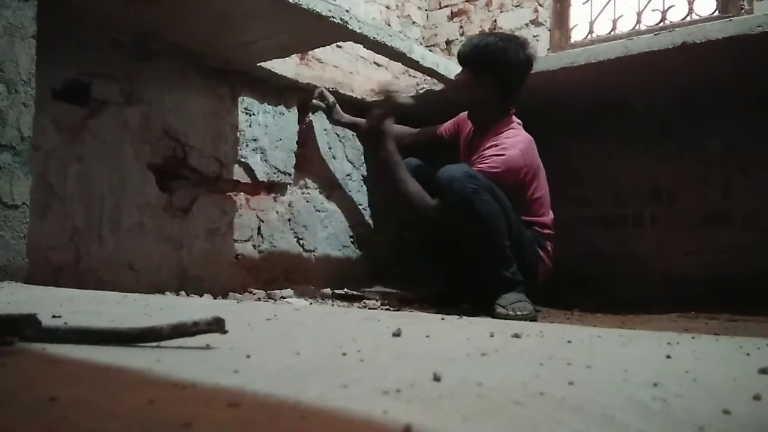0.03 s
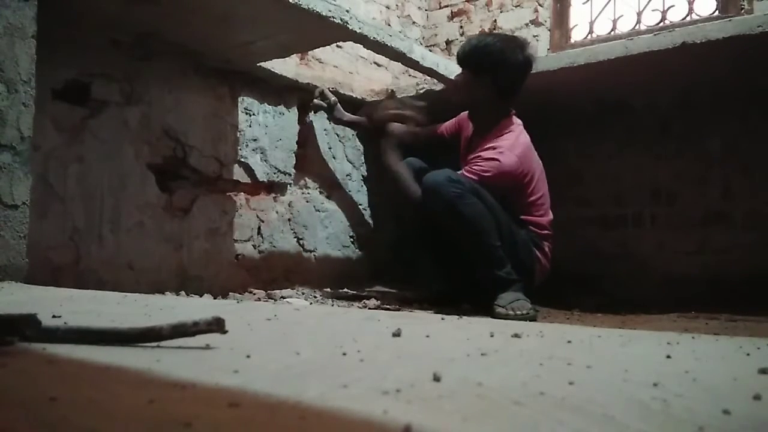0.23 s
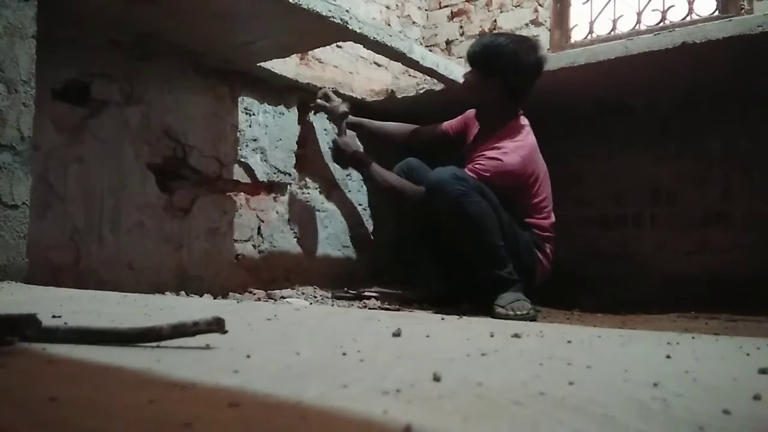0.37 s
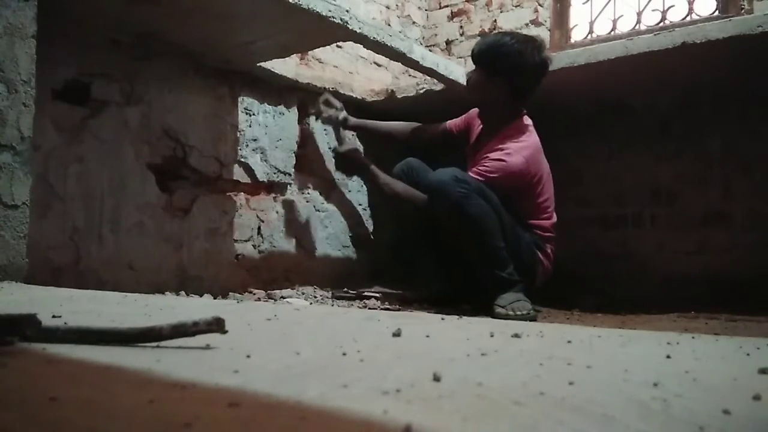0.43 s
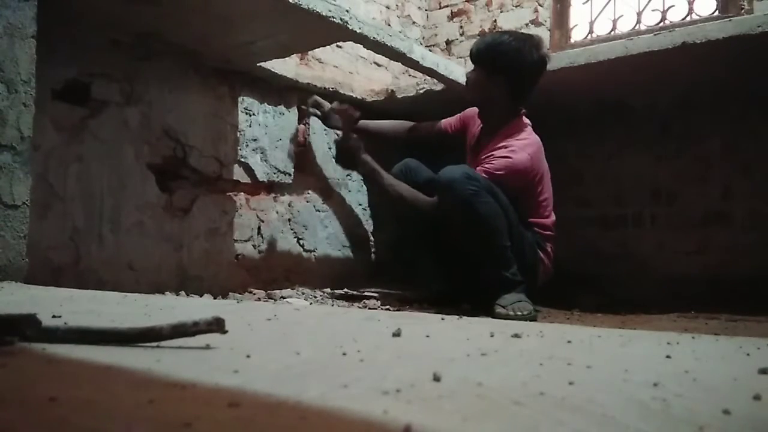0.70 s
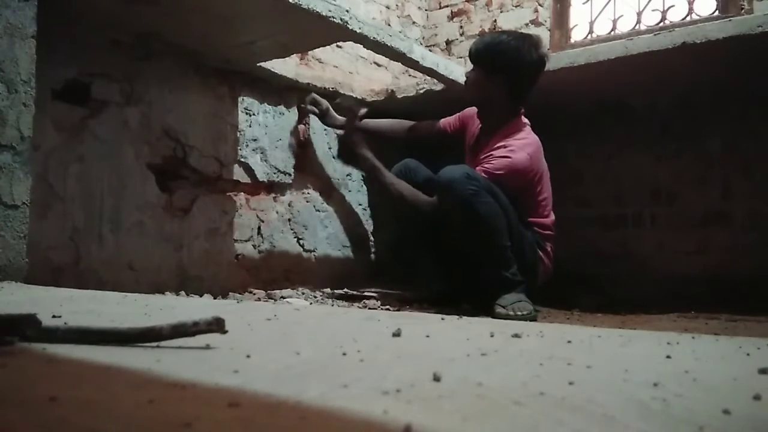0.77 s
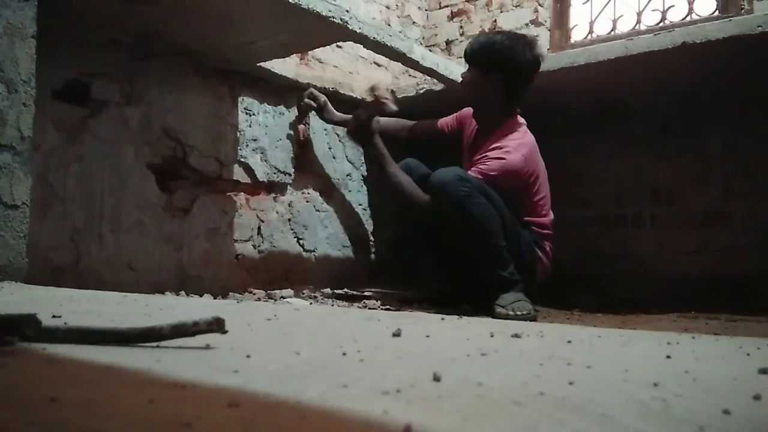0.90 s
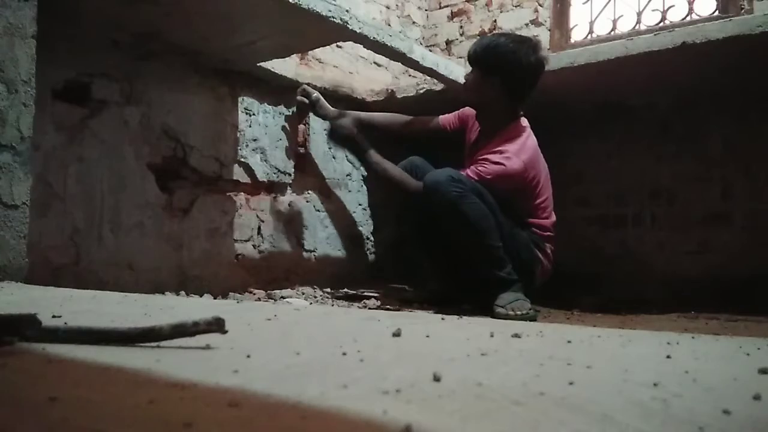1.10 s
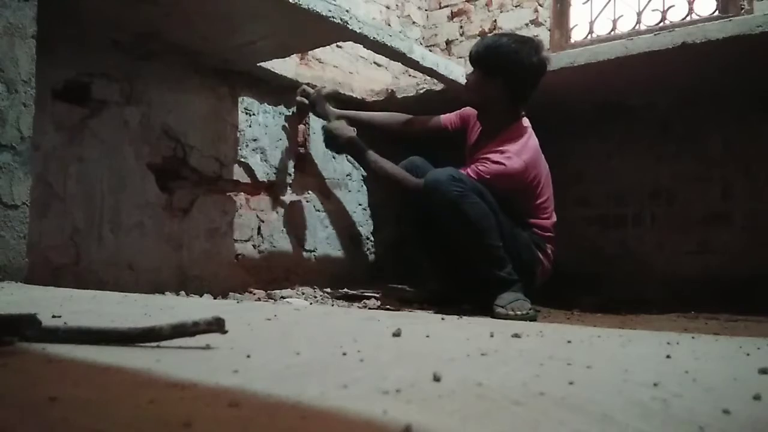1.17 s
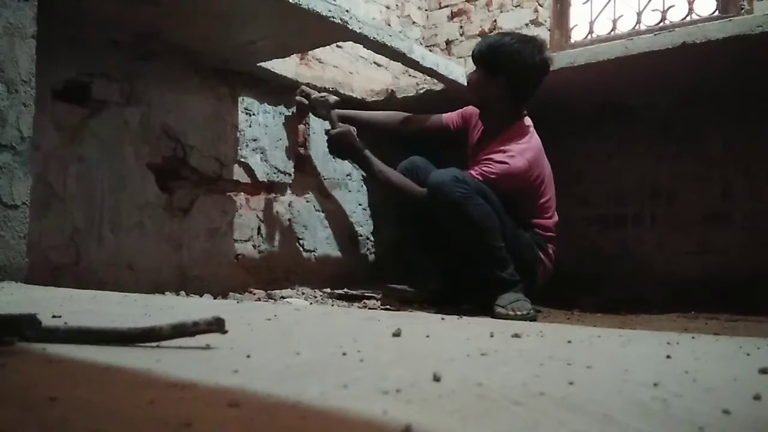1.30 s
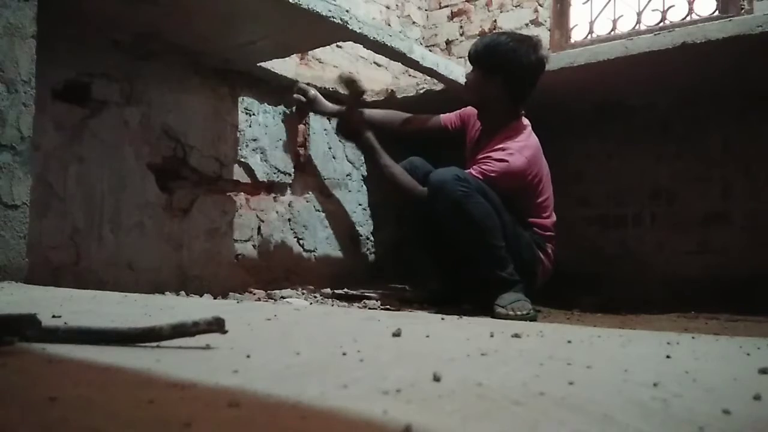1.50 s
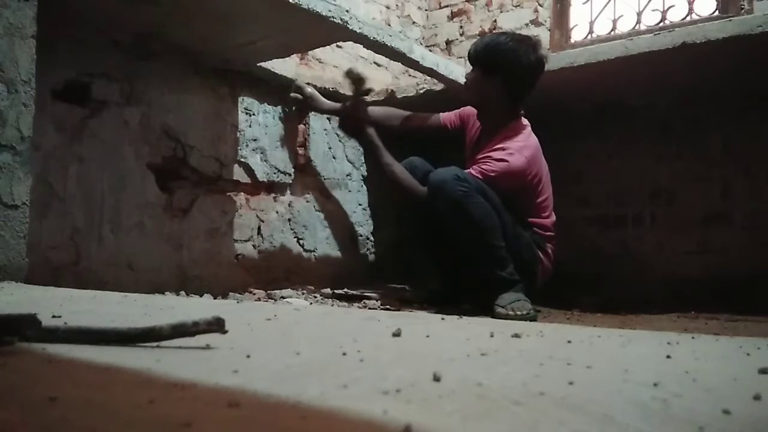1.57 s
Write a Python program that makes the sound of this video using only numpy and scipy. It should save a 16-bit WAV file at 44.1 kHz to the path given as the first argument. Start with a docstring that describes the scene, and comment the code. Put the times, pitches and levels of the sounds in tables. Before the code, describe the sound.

A hammer strikes a steel chisel into a masonry wall at about 0.35 and 1.2 seconds, each close hit a crack and thud with a very high ring and booming concrete-room reverberation; the second is slightly softer. Faint distant blows come near 0.2 and 0.9 seconds, and the chisel ticks lightly at 0.8. Grit trickles around 0.15, 0.85 and 1.55 seconds over a low rumble.

```python
"""A bare concrete room rumbles with distant blows, probably a second worker's: a faint knock, then swelling
reverberation. Grit trickles; then a hammer drives a steel chisel into the masonry wall: the wall cracks
and thuds, the chisel rings very high, the room booms, a dull echo returns, and a limiter ducks and
recovers. The chisel ticks on the wall, grit slides and another far blow sounds. The hammer strikes a
second time, the limiter ducks again, and a last trickle of grit falls as the reverberation dies away."""
import sys
import numpy as np
from scipy import signal
from scipy.fft import rfft, irfft, next_fast_len
from scipy.io import wavfile
from scipy.ndimage import uniform_filter1d

SR = 44100
rng = np.random.default_rng(int(sys.argv[2]) if len(sys.argv) > 2 else 0)


def wav_out(sig):
    """Save sig, one row per channel (or a flat mono array), as 16-bit PCM at SR to the path in sys.argv[1]."""
    wavfile.write(sys.argv[1], SR, np.round(np.clip(np.atleast_2d(sig).T, -1, 1) * 32767).astype(np.int16))


N = 72765
TIME = np.arange(N) / SR
CUTOFF_HZ, NEAR_BUILD_S = 15600, 0.0032

# Near blows. Each row: start in seconds, level in dB, thud gain in dB, chisel ring level in dB,
# favoured ring frequency in Hz, crack tilt in dB per octave, rebound delay in seconds,
# rebound gain in dB, wall note in Hz, its gain in dB.
BLOWS = [(.3550, 2, 8.5, 5, 14600, -1.5, .0208, -3, 1550, -38),
         (1.1861, -2, 8.5, -8.5, 12240, 1, .0083, -5, 1816, -34.5)]
# Far blows. Each row: start in seconds, level in dB, tilt in dB per octave,
# shift of the steel ring in Hz, its gain in dB.
FAR_BLOWS = [(-.45, -1.5, 10, -2, -38), (0.2132, -0.5, 0, 0, -28), (.8810, -1.5, -0.5, 505.5, -33)]
# The room's reverberation time. Each row: frequency in Hz, time to fall 60 dB (t60) in seconds.
ROOM_T60 = [(70, 2), (160, 1.79), (500, 1.59), (1400, 0.83), (3200, 0.98), (7500, 0.7), (11000, 0.37),
            (15000, 0.36)]


def from_db(db):
    """Decibels to amplitude ratio."""
    return 10 ** (np.asarray(db) / 20)


def rms_one(x):
    """Normalisation to unit rms."""
    return x / np.sqrt(np.mean(x ** 2) + 1e-20)


def at_hz(points, hz):
    """Interpolation of a table on a log-frequency axis."""
    frequencies, values = np.transpose(points)
    return np.interp(np.log(hz), np.log(frequencies), values)


def since(start):
    """Elapsed seconds, zero before the start."""
    return np.maximum(TIME - start, 0)


def decay(start, t60, build_s=1 / SR):
    """Exponential build-up and damping: the envelope of a struck system."""
    age = since(start)
    return (1 - np.exp(-age / build_s)) * np.exp(-np.log(1000) * age / t60)


def struck_mode(start, hz, t60, build_s=1 / SR):
    """Free vibration of one mode: a damped sinusoid."""
    return decay(start, t60, build_s) * np.sin(2 * np.pi * hz * since(start))


def band_noise(hz, width_hz):
    """A resonance smeared by the room: narrow-band noise of unit rms."""
    band = signal.butter(2, [hz - width_hz / 2, hz + width_hz / 2], "band", fs=SR, output="sos")
    return rms_one(signal.sosfilt(band, rng.standard_normal(N + SR // 10))[-N:])


def coloured(spectrum, envelope, tilt_db=0):
    """Spectral shaping: noise in overlapping octave bands, each under its own envelope(hz)."""
    size = next_fast_len(N + 1)
    bin_hz = np.maximum(np.fft.rfftfreq(size, 1 / SR), 1)
    octaves_hz = np.geomspace(60, 15360, 9)
    gains = from_db(at_hz(spectrum, bin_hz) + tilt_db * np.log2(bin_hz))
    passband = bin_hz / np.hypot(bin_hz, 20) * (bin_hz < CUTOFF_HZ)
    noise = rms_one(gains * passband) * rfft(rng.standard_normal(size))
    out = 0
    for hz in octaves_hz:
        band = np.interp(bin_hz, octaves_hz, octaves_hz == hz)
        out += envelope(hz) * irfft(noise * band, size)[:N]
    return out


def background():
    """Stationary noise: the building's low rumble."""
    # Each row: frequency in Hz, relative spectral density in dB.
    rumble_spectrum = [(25, 6), (60, -0.5), (150, 8.5), (290, -12), (400, 4.5), (800, -8.5), (1300, -8),
                       (3000, -17.5), (8000, -40), (15500, -56)]
    return from_db(-48.5) * coloured(rumble_spectrum, lambda hz: 1)


def far_blows():
    """Distant impacts: a faint, sharp knock, then swelling reverberation, wall notes and a steel ring."""
    # Knock and reverberation. Each row: frequency in Hz, relative spectral density in dB.
    far_spectrum = [(45, -24), (85, -7.5), (145, 1), (200, -8.5), (270, -8.5), (330, -16.5), (730, -15),
                    (900, -28), (1500, -12), (1900, -19), (2600, -14), (4200, -21), (5500, -22.5),
                    (6800, -15), (8300, -17), (9300, -20.5), (12000, -21.5), (15300, -11.5)]
    # Hollow notes of the far wall. Each row: frequency in Hz, bandwidth in Hz, level in dB.
    wall_modes = [(1115, 78, -37.5), (1330, 170, -33), (2272, 240, -35.5), (3194, 490, -36.5),
                  (4900, 130, -45.5)]
    build_s = 0.02
    out = 0
    for start, db, tilt_db, shift_hz, ring_db in FAR_BLOWS:
        swell = lambda hz: decay(start, at_hz(ROOM_T60, hz), build_s * (1000 / hz) ** 0.12)  # treble first
        knock = from_db(-40.5) * decay(start, t60=0.083)
        notes = sum(from_db(mode_db) * band_noise(hz, width_hz) * swell(hz)
                    for hz, width_hz, mode_db in wall_modes)
        steel = band_noise(7590 + shift_hz, width_hz=510) * decay(start, t60=0.61, build_s=build_s)
        blow = coloured(far_spectrum, lambda hz: knock + from_db(-23) * swell(hz), tilt_db)
        out += from_db(db) * (blow + notes + from_db(ring_db) * steel)
    return out


def room_boom():
    """Standing waves: every blow excites the room's modes, and the deep ones build slowly."""
    # Each row: frequency in Hz, level in dB, t60 in seconds.
    standing_waves = [(91.9, -38, 1.4), (147.7, -42, 1.5), (157.15, -35.5, 1.97), (219.5, -41.5, 1.64),
                      (246.9, -39, 0.86), (384.7, -44.5, 1.6), (577, -48.5, 1.5), (732, -47.5, 2.04),
                      (942, -51, 2.4), (1151, -49, 1.46), (1295, -53, 1.3)]
    build_cycles = 11
    waves = sum(from_db(db) * struck_mode(start + rng.random() / hz, hz, t60, build_cycles / hz)
                for start, *_ in BLOWS + FAR_BLOWS for hz, db, t60 in standing_waves)
    # Only the near blows drive the lowest mode.
    lowest = sum(from_db(db - 36) * struck_mode(start + 0.0826, hz=51.94, t60=2, build_s=0.17)
                 for start, db, *_ in BLOWS)
    return waves + lowest


def grit():
    """Shot noise: the impacts of tiny sliding grains merge into short swells."""
    # Each row: time of the peak in seconds, Gaussian width in seconds, level in dB.
    trickles = [(0.15, 0.07, -44.5), (0.854, 0.094, -50), (1.559, 0.079, -45)]
    # One grain's impact. Each row: frequency in Hz, relative spectral density in dB.
    grain_spectrum = [(700, -8), (1500, 2.5), (3000, -7.5), (5500, -11), (6600, -2.5), (7900, 1.5),
                      (9500, -6.5), (12000, -14.5), (15500, -1)]
    grains_per_s, spread_db = 2600, 2
    flow = sum(from_db(db) * np.exp(-((TIME - peak) / width) ** 2 / 2) for peak, width, db in trickles)
    impacts = (rng.random(N) < grains_per_s / SR) * rng.choice([-1, 1], N)
    strengths = from_db(spread_db * np.minimum(rng.exponential(1, N), 4))
    grain = coloured(grain_spectrum, lambda hz: decay(0, t60=0.057))
    return flow * rms_one(signal.fftconvolve(impacts * strengths, grain)[:N])


def masonry_crack(start, tilt_db, rebound_s, rebound_db):
    """Brittle fracture: masonry cracks, mortar crumbles, and the rebound's softer contact is duller."""
    # The crack with the room's response. Each row: frequency in Hz, relative spectral density in dB.
    crack_spectrum = [(100, -19), (430, 0.5), (850, 3), (1300, 1), (2000, 0), (2700, -7), (3400, -6.5),
                      (4500, -18), (8500, -7.5), (12000, -9), (15500, -11.5)]
    crack_db, crack_t60, dull_hz = -16.5, 0.022, 2200
    crack = from_db(crack_db) * decay(start, crack_t60)
    crunch = from_db(-20) * decay(start, t60=0.23)
    rebound = from_db(crack_db + rebound_db) * decay(start + rebound_s, crack_t60)
    envelope = lambda hz: crack + crunch + rebound / (1 + (hz / dull_hz) ** 2)
    return coloured(crack_spectrum, envelope, tilt_db)


def chisel_ring(start, favoured_hz):
    """Modes of a steel bar, made to flutter by the room; the point of impact decides which are strong."""
    # Each row: frequency in Hz, level when favoured in dB, t60 in seconds, bandwidth before spread in Hz.
    steel_modes = [(5140, -31, .7, 25), (5500, -29.5, 0.77, 230), (6470, -28, 0.65, 9.1),
                   (7540, -29.5, 0.71, 120), (8080, -30.5, 0.59, 360), (11100, -20, 0.32, 34),
                   (12360, -31, 0.43, 15), (12450, -23.5, 0.32, 60), (14370, -24, 0.36, 44),
                   (15070, -25, 0.3, 220)]
    favour_db, favour_width_hz, spread_hz = 14, 1800, 18
    out = 0
    for hz, db, t60, width_hz in steel_modes:
        loss_db = favour_db * (1 - np.exp(-((hz - favoured_hz) / favour_width_hz) ** 2))
        out += from_db(db - loss_db) * decay(start, t60) * band_noise(hz, width_hz + spread_hz)
    return out


def room_tail(start):
    """Reverberation of a near blow: the bass gathers slowly and outlasts the treble."""
    # Each row: frequency in Hz, relative spectral density in dB.
    tail_spectrum = [(35, -32), (60, -18), (167, -3.5), (305, -8), (385, -5), (533, -19.5), (721, -6.5),
                     (1230, -10.5), (1830, -7.5), (3670, -22), (6870, -19), (7900, -13.5), (12300, -20),
                     (13200, -31), (14100, -14.5), (15500, -12)]
    bass_build_s, bass_hz = 0.078, 94
    build_s = lambda hz: NEAR_BUILD_S + bass_build_s / (1 + (hz / bass_hz) ** 2)
    envelope = lambda hz: decay(start, at_hz(ROOM_T60, hz), build_s(hz))
    return from_db(-25) * coloured(tail_spectrum, envelope)


def near_blows():
    """Impact excitation: the wall radiates a pressure pulse and cracks; wall, room and chisel resonate."""
    pulse_s = 0.00014
    out = 0
    for (start, db, thud_db, ring_db, favoured_hz, tilt_db,
         rebound_s, rebound_db, wall_hz, wall_db) in BLOWS:
        age = since(start) / pulse_s
        pulse = from_db(-3) * age * (2 - age) * np.exp(-age)
        crack = masonry_crack(start, tilt_db, rebound_s, rebound_db)
        thud = from_db(thud_db - 23) * struck_mode(start, hz=55.6, t60=0.038)
        wall_note = from_db(wall_db) * band_noise(wall_hz, width_hz=160) * decay(start, t60=1.12)
        out += from_db(db) * (pulse + crack + thud + wall_note + room_tail(start))
        out += from_db(ring_db) * chisel_ring(start, favoured_hz)
    return out


def late_echoes():
    """Delayed reflection: each near blow returns once, dull, from the far end of the building."""
    # Each row: frequency in Hz, relative spectral density in dB.
    echo_spectrum = [(60, -11), (145, 3), (300, -8), (700, -8.5), (2500, -20), (8000, -59)]
    delay_s = 0.1394
    bumps = sum(from_db(db - 28.5) * decay(start + delay_s, t60=0.18, build_s=NEAR_BUILD_S)
                for start, db, *_ in BLOWS)
    return coloured(echo_spectrum, lambda hz: bumps)


def chisel_tick():
    """A light impact excites briefly ringing modes as the chisel's tip is set on the wall."""
    # Each row: start in seconds, level in dB.
    touches = [(.796, -39.5)]
    # Each row: frequency in Hz, gain in dB, t60 in seconds.
    tick_modes = [(640, -1.5, 0.14), (2140, 3, 0.05), (2280, -12, 0.1), (5300, -10, 0.076),
                  (8240, -5, 0.049), (10030, 1.5, 0.039), (12400, -9, 0.19), (14170, -1, .05)]
    return sum(from_db(db + mode_db) * struck_mode(start, hz, t60)
               for start, db in touches for hz, mode_db, t60 in tick_modes)


def scene():
    """Superposition: all sources add at one point, the same in both channels."""
    mono = near_blows() + late_echoes() + far_blows() + room_boom() + chisel_tick() + grit() + background()
    return np.array([mono, mono])


def record(dry):
    """Limiting: the gain ducks after peaks and recovers; saturation rounds the rest; the top is cut."""
    threshold_db, share, attack_s, release_db_per_s, ceiling = -21, 0.61, 0.00047, 30.5, 0.32
    level_db = 10 * np.log10(np.maximum(uniform_filter1d(dry[0] ** 2, size=64), 1e-12))
    wanted_db = np.maximum(level_db - threshold_db, 0) * share
    release_db = release_db_per_s * TIME
    held_db = np.maximum.accumulate(wanted_db + release_db) - release_db
    pole = np.exp(-1 / (attack_s * SR))
    duck_db = signal.lfilter([1 - pole], [1, -pole], held_db)
    limited = ceiling * np.tanh(dry * from_db(-duck_db) / ceiling)
    low_pass = signal.ellip(12, .2, 80, CUTOFF_HZ, fs=SR, output="sos")
    return signal.sosfilt(low_pass, limited)


dry = scene()
out = record(dry)
wav_out(out)
```